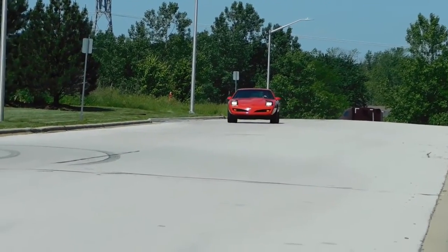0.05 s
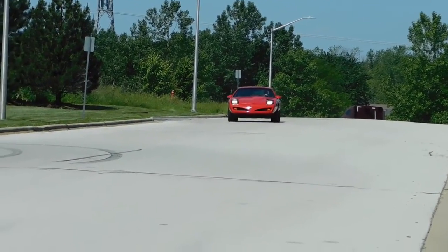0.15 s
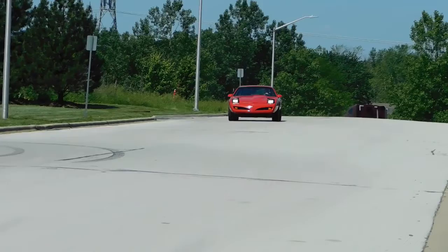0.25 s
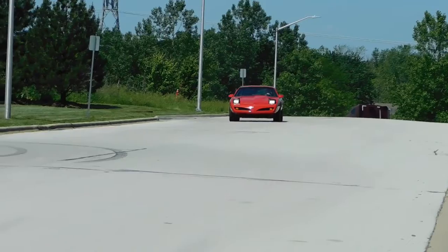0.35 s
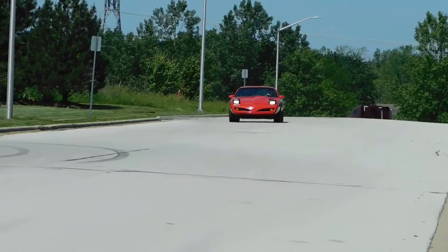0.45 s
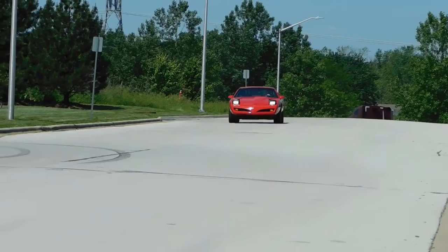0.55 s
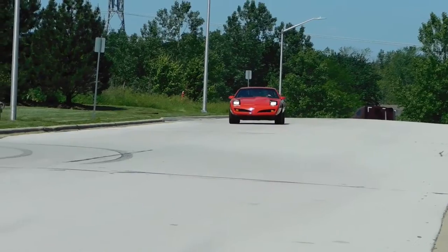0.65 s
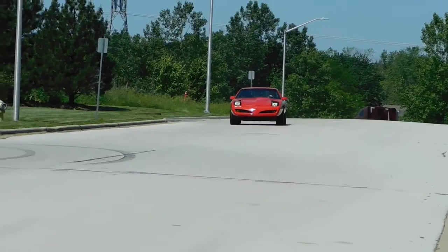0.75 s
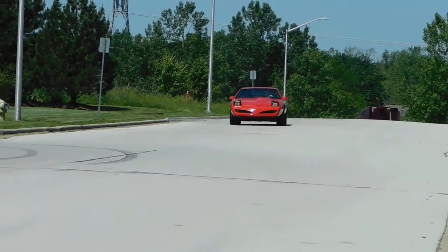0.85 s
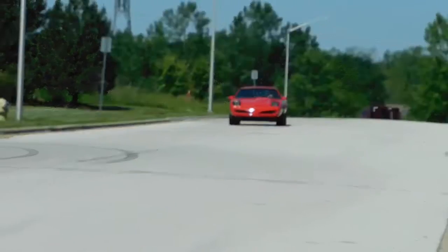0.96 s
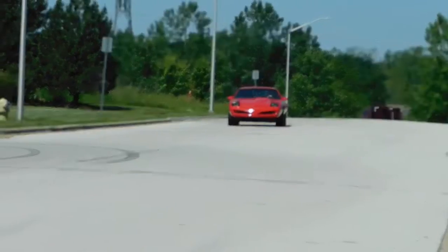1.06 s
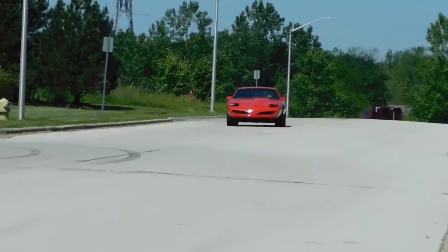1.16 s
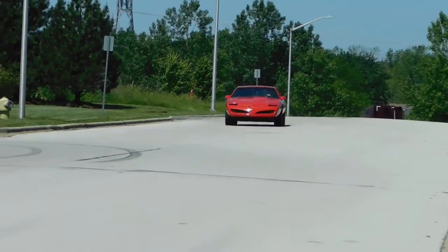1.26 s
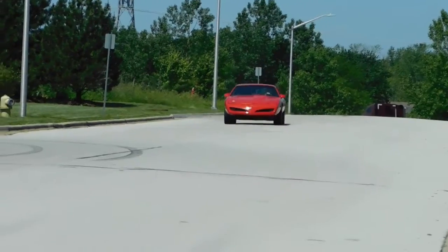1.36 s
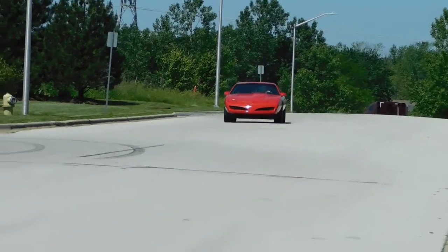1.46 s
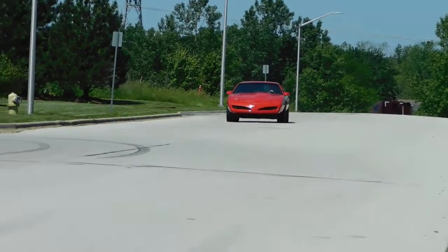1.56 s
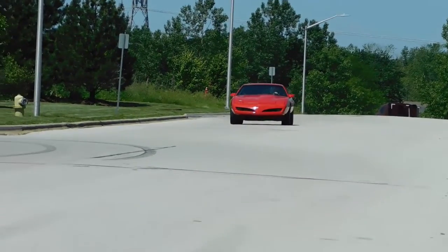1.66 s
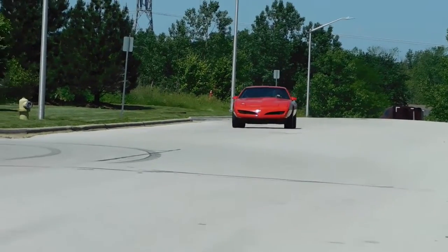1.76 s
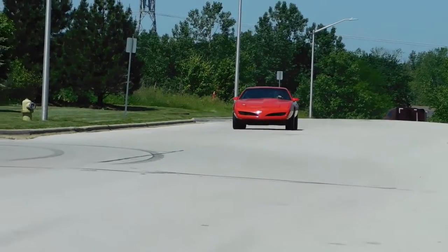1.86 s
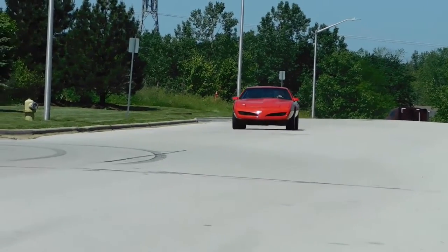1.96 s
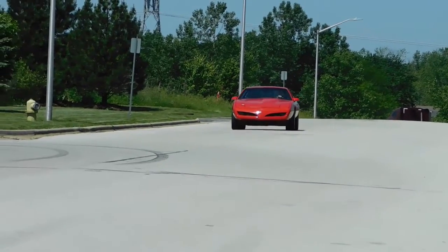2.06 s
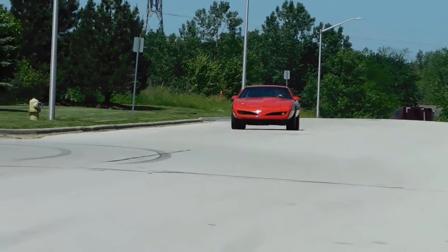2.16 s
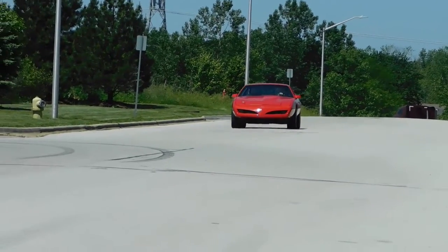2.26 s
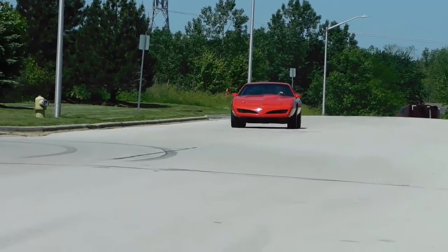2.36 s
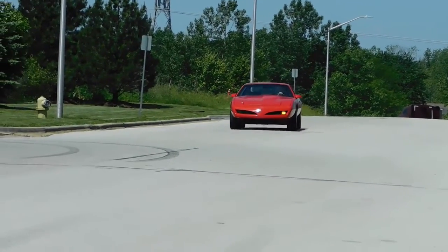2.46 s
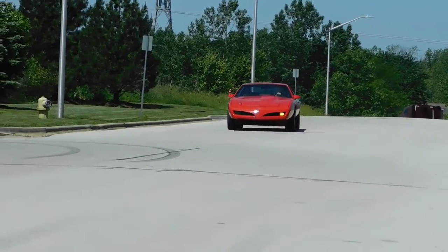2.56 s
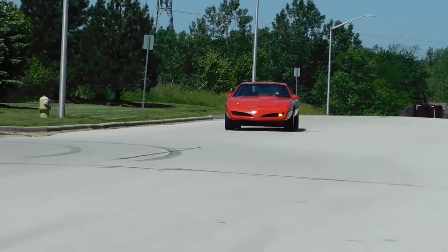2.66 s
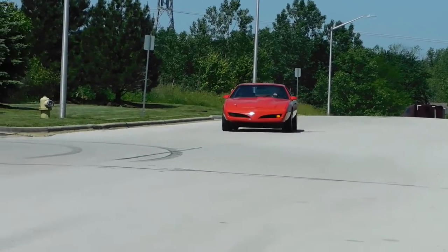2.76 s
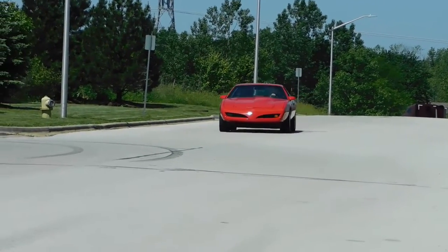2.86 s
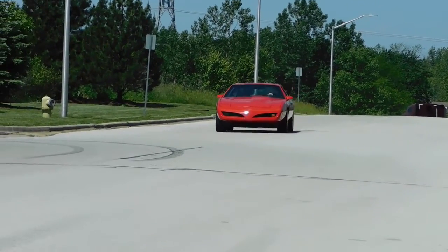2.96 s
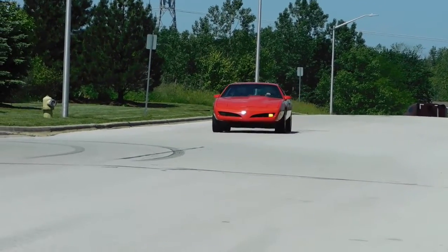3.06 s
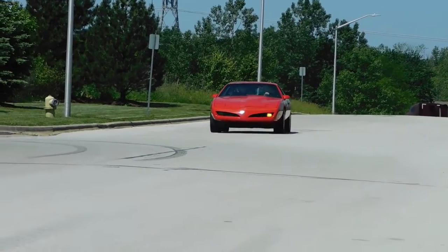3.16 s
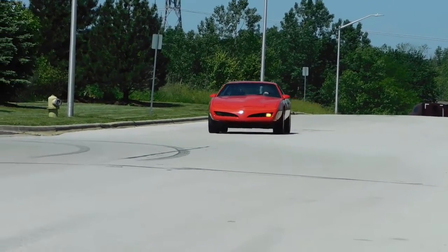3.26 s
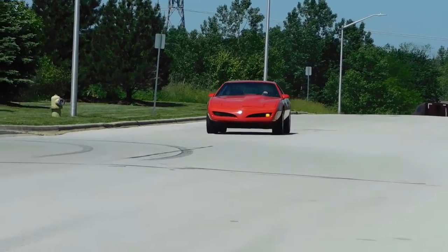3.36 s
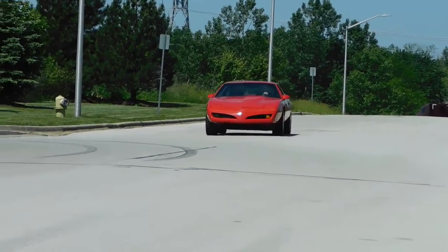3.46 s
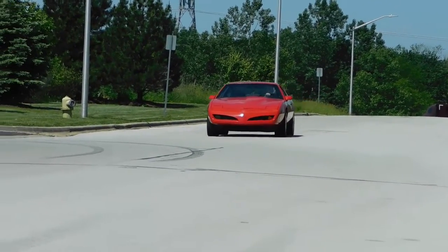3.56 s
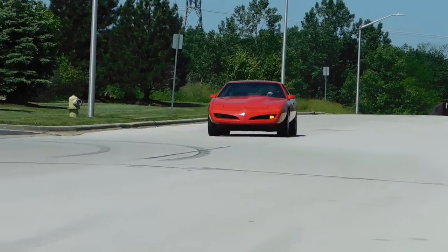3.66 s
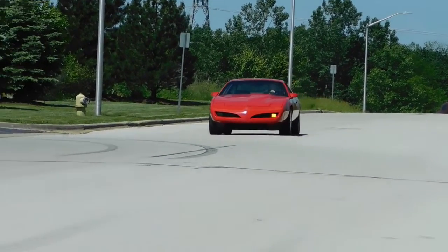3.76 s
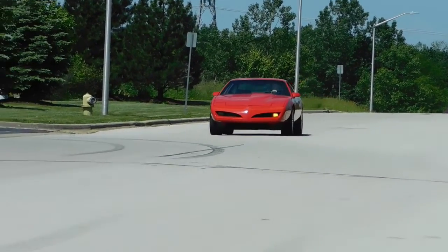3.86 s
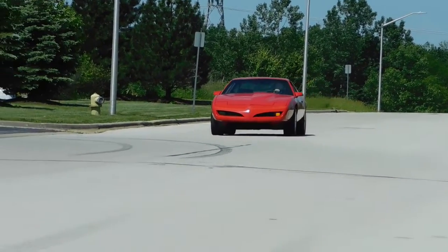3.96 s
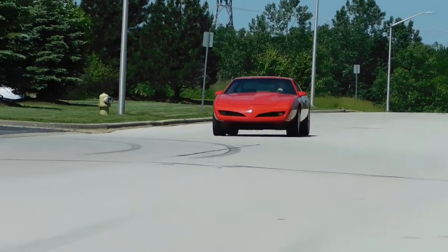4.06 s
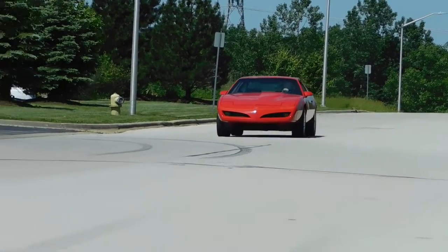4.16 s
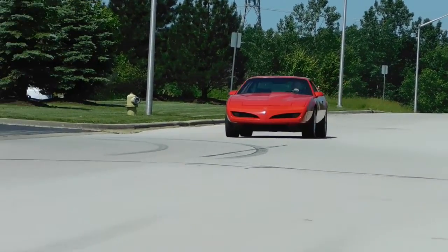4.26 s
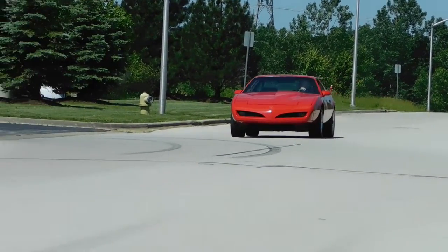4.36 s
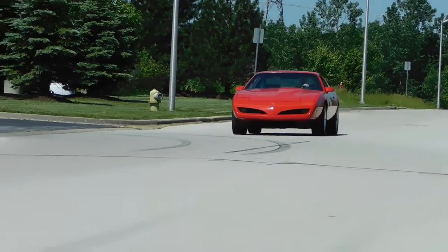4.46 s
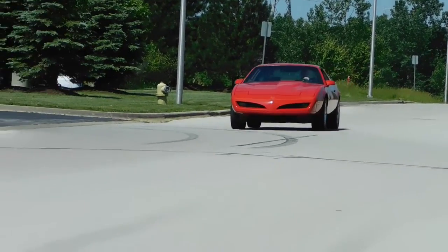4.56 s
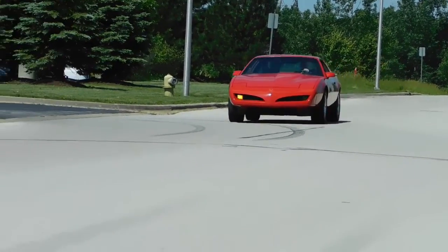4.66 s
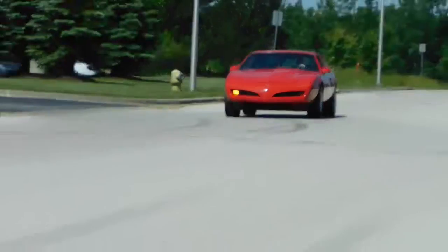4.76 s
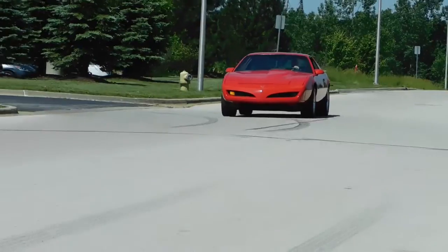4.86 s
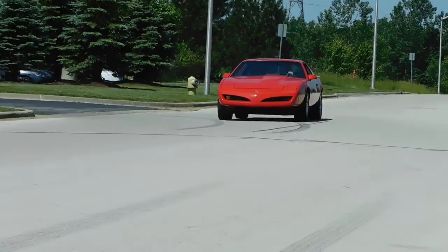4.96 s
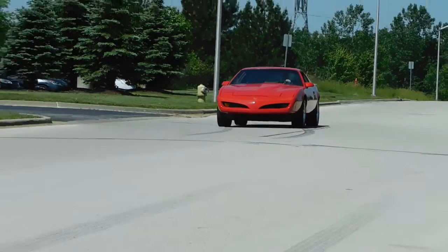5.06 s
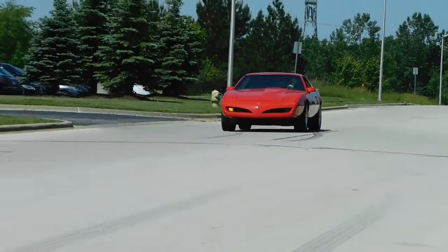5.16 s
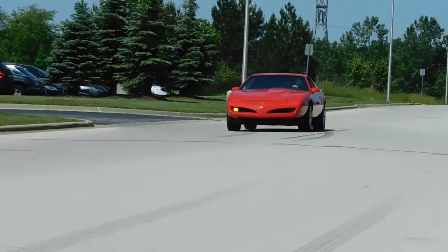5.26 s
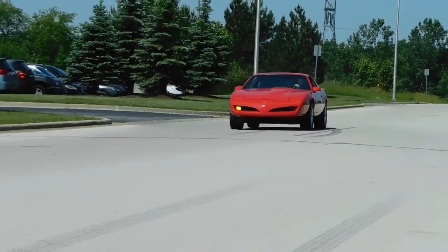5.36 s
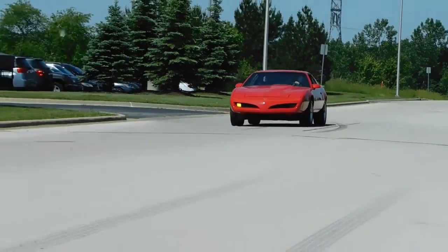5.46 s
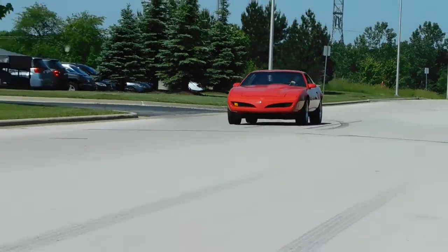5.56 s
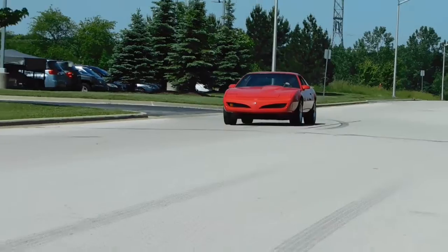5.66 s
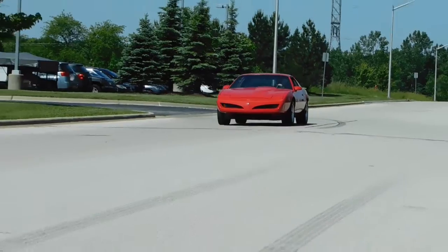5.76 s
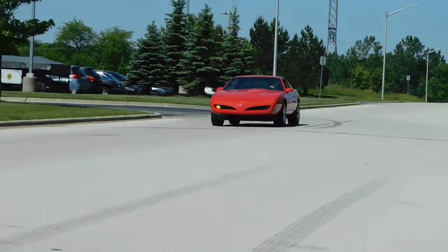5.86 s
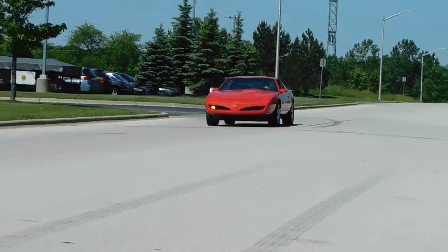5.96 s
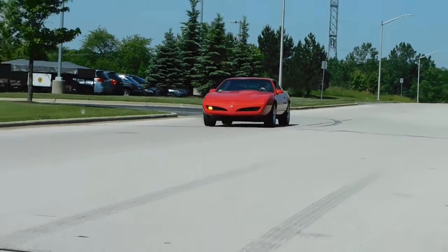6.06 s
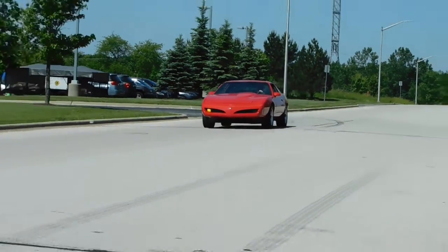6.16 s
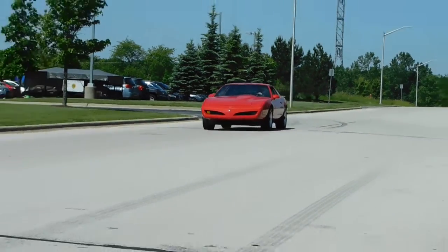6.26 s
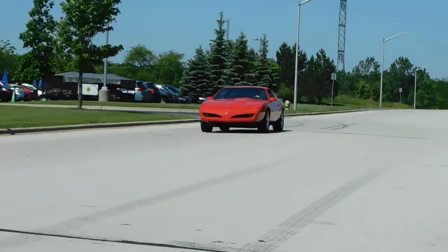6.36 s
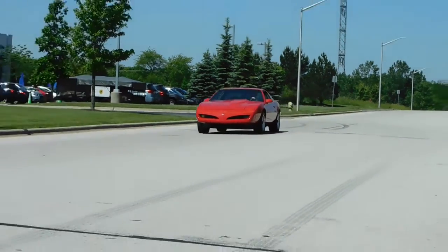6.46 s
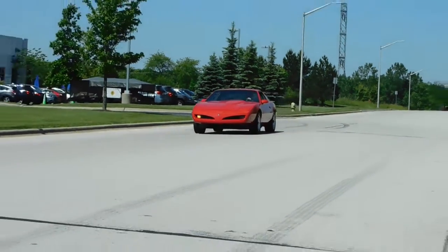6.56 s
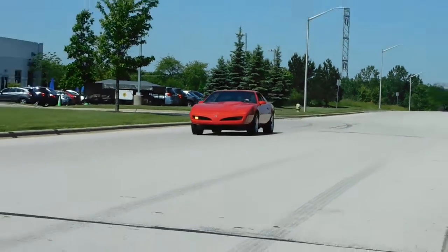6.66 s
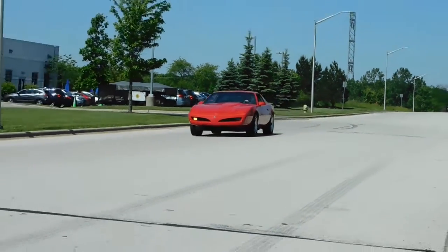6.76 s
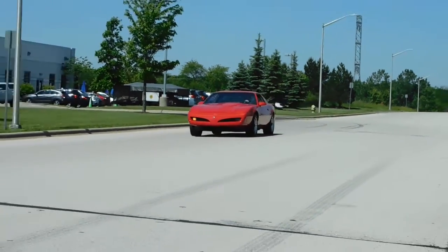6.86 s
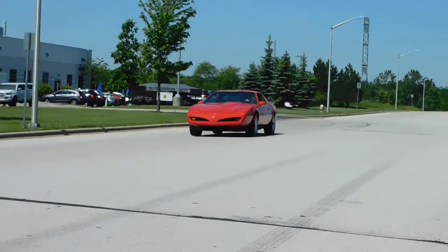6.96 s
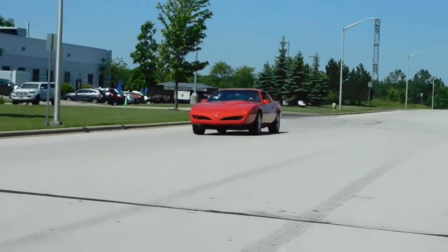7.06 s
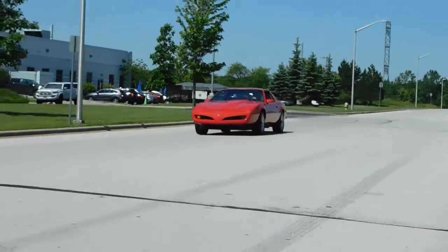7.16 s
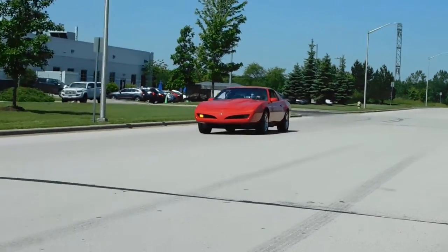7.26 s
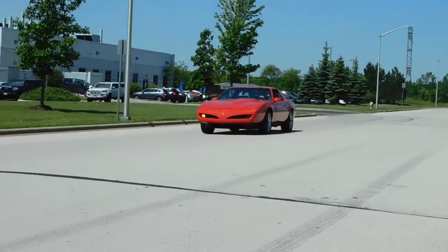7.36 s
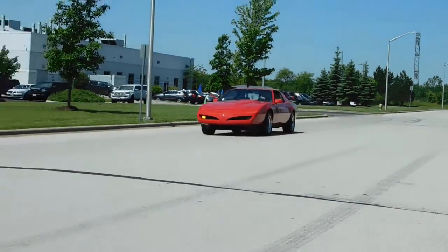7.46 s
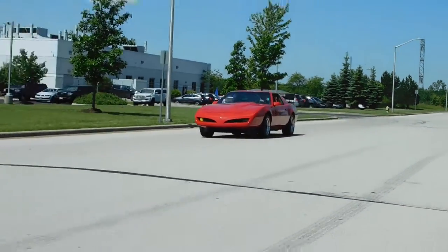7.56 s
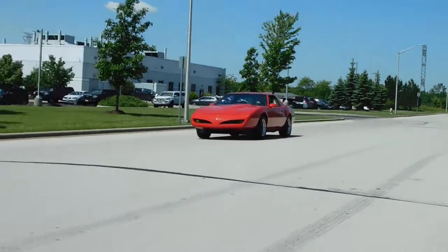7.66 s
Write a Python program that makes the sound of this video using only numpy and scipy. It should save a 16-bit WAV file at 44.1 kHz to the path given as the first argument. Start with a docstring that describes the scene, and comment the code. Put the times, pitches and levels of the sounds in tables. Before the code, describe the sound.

A V8 car approaches over concrete for about 7.7 seconds, heard by a hand-held camera's stereo microphone outdoors. At first there is mid-toned tyre roar and low exhaust hum over soft distant traffic and faint leaves. Small birds chip and slur, with buzzy nearer calls at 0.7 and 2.1 s. A faint tyre slap comes at 2.8 s. Near 4 s the engine rises under a dab of throttle, while quick double chips and a thin trill sound. Finger ticks at 4.7 s start a zoom motor, hissing and thinly whining on the left, with a short whistle. The engine eases; three short, bright two-tone horn toots sound at 5.2, 5.8 and 6.3 s, lightly echoing, the last with a sharp tyre slap. Tyre hiss and grit swell closer. A stony snap at 7.3 s precedes a hard rev, its pitch climbing steeply to the end.

```python
"""Car with a horn on a concrete road

A V8 coupe rolls toward a hand-held camera, toots its two-tone horn three times, then revs up hard.
Shaped noise makes the tyres, traffic and leaves; stacked sine waves make the engine and horn.
Birds are gliding whistles, and short decaying rings are tyre slaps and finger knocks.
The camera's zoom motor adds hiss and a wavering whine, louder on the left."""
import sys
import numpy as np
from scipy import signal
from scipy.fft import rfft, irfft, next_fast_len
from scipy.io import wavfile

SR = 44100
rng = np.random.default_rng(int(sys.argv[2]) if len(sys.argv) > 2 else 0)


def wav_record(signal):
    """Record a signal, one row per channel, as 16-bit PCM in the file named by sys.argv[1]."""
    frames = np.transpose(np.atleast_2d(signal))
    bounded = np.clip(frames, -1, 1)
    # unit amplitude maps onto the largest positive 16-bit level
    quanta = np.round(bounded * 32767).astype(np.int16)
    wavfile.write(sys.argv[1], SR, quanta)


N = 340438
TIME = np.arange(N) / SR

# colours of the noises, relative levels: pitch_hz, level_db (per Hz)
RUMBLE = [(25, -19), (45, -19), (70, -12.5), (110, -0.5), (200, 0), (320, -2.5), (440, 3.5), (600, -3.5),
          (900, -42)]  # low tyre rumble
ROAR = [(350, -14), (600, -16.5), (740, -6.5), (860, 0), (1000, 1), (1250, 0.5), (1400, -3), (1600, -9),
        (2000, -13), (2800, -24.5), (5000, -34)]  # tyre tread
HISS = [(900, -21), (1700, 3.5), (2600, 3.5), (3600, -2.5), (5000, -5), (7000, -3.5), (8500, -12),
        (10500, -20), (13500, -25.5), (16000, -25)]  # tyre hiss, also used for leaves
TRAFFIC = [(25, -6), (45, -11), (75, -1.5), (130, -5.5), (300, -2), (600, -1), (1000, -3), (1600, -0.5),
           (2300, -5.5), (3300, -7.5), (4200, -18.5), (7000, -31), (10000, -34.5), (16000, -38)]  # far traffic
GEARS = [(900, -16), (1800, -3), (2300, -3), (2650, 4), (3100, -3), (4500, -16.5), (6000, -16),
         (8000, -19.5), (11000, -22), (14000, -18), (16000, -32)]  # zoom motor gears
# how the microphone pair hears the scene: pitch_hz, left_minus_right_db
BALANCE_DB = [(60, .5), (200, .5), (400, 0), (500, -3), (620, 0), (760, 5.5), (1000, 5), (1200, 1.5),
              (1420, -1.5), (1850, 5), (2400, 2.5), (3300, 7), (4400, 7), (8000, 7), (13000, -2)]
# how alike left and right are: pitch_hz, likeness (1 same, 0 unrelated, -1 opposite)
CAR_LIKENESS = [(100, 0.95), (350, 1), (640, 0.76), (1200, 0.97), (3100, 0.91), (6800, -0.22),
                (14000, -0.94)]
FAR_LIKENESS = [(100, 1), (300, 0.97), (640, 0.85), (1400, -0.26), (3100, -0.67), (7000, 0.048),
                (14000, 0.44)]
# colour of echoes from trees and buildings: pitch_hz, level_db
ECHO = [(100, -14), (420, 4), (800, -1), (1500, 6.5), (4000, -6.5), (12000, -13)]
# the driver's foot, a dab of throttle, a coast, then a kick-down: time_s, firing_hz, load (0-1)
ENGINE = [(0, 74, 0.9), (1.2, 73.57, 0), (3.6, 72.4, 0), (3.98, 78, 0), (4.17, 86.1, 0.65),
          (4.58, 89.3, 0.6), (4.93, 73.93, .25), (5.5, 74.3, 0.5), (6.05, 76.5, 0.43), (6.9, 79.8, 0.13),
          (7.06, 81.43, .5), (7.33, 83.3, .4), (7.42, 105.9, 0.94), (7.5, 126.8, 0.94), (7.57, 138.1, 0.8),
          (7.72, 160.2, 0.12)]
# engine tones; uneven firing in each bank adds some three cycles off the main ones:
# multiple (of the two-turn cycle rate), level_db
ENGINE_ORDERS = [(5, 2), (8, 2.5), (11, -2), (13, -11), (14, -9), (16, 3), (19, -14.5), (21, -11),
                 (24, -6.5), (27, -10.5), (29, -16.5), (32, -18.5), (35, -7), (39, -9.5), (40, -17),
                 (45, -1), (48, -3.5)]
# exhaust resonances: pitch_hz, level_db
EXHAUST = [(35, -24), (55, -15.5), (76, 0.5), (88, -2.5), (108, 5), (130, 1), (155, -1.5), (200, -1),
           (228, 0), (249, 9.5), (275, -2), (310, 0.5), (360, 3), (460, -3.5), (700, -21), (1400, -20)]
# horn presses: start_s, end_s, level_db, brightness_db
TOOTS = [(5.238, 5.381, 1.5, -1.5), (5.786, 5.95, 1.5, -0.5), (6.342, 6.512, 1, 5.5)]
# at each press: doppler_pitch_ratio, lag_s (of a reflection off road or bodywork)
HORN_PATHS = [(1, .000635), (1.0003, .000695), (1.001, .00196)]
# horn harmonics: number, low_horn_db, high_horn_db
HORN = [(1, -39, -39.5), (2, -32.5, -42), (3, -30, -31), (4, -42, -33), (5, -39, -40.5), (6, -41, -50.5),
        (7, -48.5, -48.5), (8, -51, -52.5), (9, -57, -75), (10, -58.5, -66), (11, -79, -67),
        (12, -72, -66.5), (13, -73, -68), (14, -70, -71), (15, -74, -77), (16, -71, -78), (17, -74, -74),
        (19, -83, -73), (21, -71.5, -89)]
# sharp knocks: tyres slapping slab joints, and from 7.28 s a knock on the camera: time_s, level_db, ring_hz,
# ring_t60_s (time to fall 60 dB),
SLAPS = [(2.8061, -16.5, 1250, 0.02, -40), (2.8077, -26, 940, .014, -40), (2.817, -30, 1230, .04, -40),
         (2.881, -33, 1190, 0.04, -40), (6.285, -8, 1296, 0.0097, 1), (6.293, -19, 906, .016, -22),
         (7.284, -26, 1166, .008, 10), (7.344, -19, 1019, .008, 9.5)]
# fingers on the zoom lever and camera shell: same columns as SLAPS
HANDLING = [(4.671, -35, 3180, 0.0088, -15), (4.6905, -41, 2670, .05, -15), (4.697, -36, 4200, .004, -2),
            (4.721, -33, 3130, .006, -6), (4.7575, -25.5, 620, 0.019, 2)]
# shapes of the bird notes: share_of_length, pitch_hz, level_db
CALL_SHAPE = [(0, 6500, -20), (.14, 5700, -10), (.2, 4500, -6), (.31, 4900, 1.5), (.42, 4100, 3),
              (.53, 3380, -4), (.61, 3170, -14), (.69, 3100, -1), (.83, 4100, -8), (.88, 3450, -1),
              (1, 3100, 3)]
CHIP_SHAPE = [(0, 4890, -4), (.5, 4390, -2), (1, 3630, -3)]
SLUR_SHAPE = [(0, 4450, -3), (.55, 4080, -1.5), (1, 4400, -2)]
THIN_SHAPE = [(0, 6950, -2), (.4, 7220, 0), (1, 7280, -2)]
# a near bird's buzzy two-part call: start_s, length_s, level_db, stretch (of pitch above CALL_BASE_HZ)
CALLS_NEAR = [(.712, .128, -53.5, .88), (2.136, .153, -50, 1.22)]
# falling chips, soft slurs and thin rising whistles: start_s, length_s, level_db, pitch_ratio
CHIPS = [(.172, 0.04, -64, 1.04), (1.352, .04, -65, 1.1), (1.72, .045, -68, 1.02), (2.42, .035, -66, 1.04),
         (3.625, .045, -62, 1.01), (3.842, .025, -58, 1.0), (3.88, .025, -63, 1.0)]
SLURS = [(0.347, .075, -65, 0.93), (1.53, .07, -67, 1.04), (1.775, 0.061, -59, .86),
         (2.66, .045, -67, 1.02), (3.795, 0.082, -62, 1.02)]
THIN_NOTES = [(3.64, .08, -75, 1.0), (3.89, .075, -75, .995)]

# the car closes in at a steady speed and would pass the camera at PASS_S
SPEED_M_PER_S, PASS_S, KERB_M = 9.08, 8.643, 3.6
# parts of the car: level at NEAR_M (dB), loss per doubling of the distance (dB)
NEAR_M = 9.0
RUMBLE_DB, RUMBLE_LOSS_DB = -41.5, 6.5
ROAR_DB, ROAR_LOSS_DB = -28.0, 6
HISS_DB, HISS_LOSS_DB = -32.0, 14.5
ENGINE_DB, ENGINE_LOSS_DB = -39.5, 10
LOAD_DB = 8.5  # full load over coasting
# exhaust gas adds to the rumble as the firing rate climbs; no change at RUSH_FROM_HZ
RUSH_FROM_HZ, RUSH_DB_PER_OCTAVE = 78, 4.5
# the brow of the road screens the tyre roar until the car has climbed over it
CREST_S, CREST_LASTS_S, CREST_SHADOW_DB = 2.37, 0.35, 2.5
LEAVES_DB, TRAFFIC_DB = -65, -49.0
CALL_BASE_HZ = 3040
# a run of double chips at an even pace
RUN_START_S, RUN_PERIOD_S, PAIR_GAP_S, RUN_CHIP_S, RUN_DB = 4.008, .149, .036, 0.0261, -59.5
# a long, slowly sinking thin trill
TRILL_START_S, TRILL_S, TRILL_FROM_HZ, TRILL_TO_HZ, TRILL_DB = 4.06, .44, 7600, 7380, -71
# the zoom motor surges as it starts, runs evenly, then its whine fades
ZOOM_START_S, SURGE_DB, SURGE_S = 4.692, 6.5, 0.043
GEARS_DB, WHINE_DB, WHISTLE_DB = -52.5, -63.5, -54.5
WHINE_HOLD_S, WHINE_FADE_DB_PER_S = 0.85, 5
LOW_HORN_HZ, HIGH_HORN_HZ = 384.8, 470.5
CUTOFF_HZ = 15600


def from_db(db):
    """Turn decibels into a gain."""
    return 10 ** (np.asarray(db) / 20)


def rms_one(x):
    """Scale to an average strength (rms) of 1."""
    return x / np.sqrt(np.mean(x ** 2) + 1e-20)


def in_time(rows):
    """Turn a table whose first column is time into one smooth-running curve per other column."""
    s, *columns = np.transpose(rows)
    return [np.interp(TIME, s, column) for column in columns]


def at_hz(points, hz):
    """Read a pitch table at any pitch, on a log-frequency scale."""
    table_hz, values = np.array(points)[:, 0], np.array(points)[:, 1]
    return np.interp(np.log(hz), np.log(table_hz), values)


def pan(db):
    """Left and right gains that differ by db."""
    return from_db(np.array([[db / 2], [-db / 2]]))


def drift(rate):
    """A random wander of spread 1; a higher rate (Hz) wanders faster."""
    step = 40  # samples between the points worked out
    r = np.exp(-2 * np.pi * rate * step / SR)
    kicks = rng.standard_normal(N // step + 2002)
    slow = signal.lfilter([1], [1, -2 * r, r * r], kicks)[2000:]  # skip the settling time
    return np.interp(np.arange(N) / step, np.arange(len(slow)), rms_one(slow))


def noise(spectrum, likeness):
    """Stereo noise of rms 1 with a given colour, falling away beyond both ends of its table."""
    size = next_fast_len(N)
    hz = np.maximum(np.fft.rfftfreq(size, 1 / SR), 1)
    low_end = np.minimum(hz / spectrum[0][0], 1) ** 2
    high_end = np.minimum(spectrum[-1][0] / hz, 1) ** 2
    colour = from_db(at_hz(spectrum, hz)) * low_end * high_end
    mid, side = rfft(rng.standard_normal((2, size))) * colour
    alike = np.clip(at_hz(likeness, hz), -1, 1)
    stereo = np.sqrt(1 + alike) * mid + np.sqrt(1 - alike) * side * [[1], [-1]]
    return rms_one(irfft(stereo, size)[:, :N])


def phase_of(hz):
    """Running phase of a changing frequency."""
    return 2 * np.pi * np.cumsum(hz) / SR


def at_distance(near_db, loss_db):
    """Level over time of a part of the car's sound as the car closes in."""
    metres = np.hypot(SPEED_M_PER_S * (PASS_S - TIME), KERB_M)
    return near_db - loss_db * np.log2(metres / NEAR_M)


def tyres(flutter_db, hiss_flutter_db):
    """Rumble joined by exhaust rush, tread roar near 1 kHz and close-range hiss; moving air wavers the last two."""
    rush_db = RUSH_DB_PER_OCTAVE * np.log2(in_time(ENGINE)[0] / RUSH_FROM_HZ)
    shadow_db = CREST_SHADOW_DB * (1 - np.tanh((TIME - CREST_S) / CREST_LASTS_S)) / 2
    rumble_db = at_distance(RUMBLE_DB, RUMBLE_LOSS_DB) + rush_db
    roar_db = at_distance(ROAR_DB, ROAR_LOSS_DB) - shadow_db + flutter_db * drift(14)
    hiss_db = at_distance(HISS_DB, HISS_LOSS_DB) + hiss_flutter_db * drift(28)
    rumble = from_db(rumble_db) * noise(RUMBLE, CAR_LIKENESS)
    roar = from_db(roar_db) * noise(ROAR, CAR_LIKENESS)
    hiss = from_db(hiss_db) * noise(HISS, CAR_LIKENESS)
    return rumble + roar + hiss


def engine(jitter, rough, boom_db):
    """Tones tied to the firing rate sweep through the exhaust resonances; under load the silencer booms."""
    firing_hz, load = in_time(ENGINE)
    level_db = at_distance(ENGINE_DB, ENGINE_LOSS_DB) + LOAD_DB * load
    cycle_hz = firing_hz / 8  # eight firings in each two-turn cycle
    phase = phase_of(cycle_hz * (1 + jitter * drift(11.2)))
    tones, power = 0, 0
    for order, db in ENGINE_ORDERS:
        order = round(order)
        hz = order * cycle_hz
        boom = np.interp(hz, [90, 177, 250, 302.3], [-0.28, 0.84, 1.0, 0.75])
        gain = from_db(db + at_hz(EXHAUST, hz) + boom_db * load * boom)
        roughness = 1 + rough * drift(8.3)
        tones = tones + gain * roughness * np.sin(order * phase + rng.uniform(0, 2 * np.pi))
        power = power + gain ** 2 / 2
    # resonances and boom colour the tone; level_db sets its strength
    return from_db(level_db) * tones / np.sqrt(power)


def far_traffic():
    """Traffic far off: a steady noise, strongest in the lows and mids."""
    return from_db(TRAFFIC_DB) * noise(TRAFFIC, FAR_LIKENESS)


def leaves():
    """The roadside trees: a faint steady hiss."""
    return from_db(LEAVES_DB) * noise(HISS, CAR_LIKENESS)


def notes(shape, rows, buzz_hz, buzz_share, edge_s, base_hz=0):
    """Whistles of one shape, stretched in time and in pitch above a base; a fast buzz grows with the pitch."""
    out = np.zeros(N)
    share, shape_hz, shape_db = np.transpose(shape)
    for start, length, db, ratio in rows:
        t = np.arange(int(length * SR)) / SR
        buzz = 1 + buzz_share * np.sin(2 * np.pi * buzz_hz * t + rng.uniform(0, 2 * np.pi))
        glide_hz = np.interp(t / length, share, shape_hz)
        hz = base_hz + ratio * buzz * (glide_hz - base_hz)
        edges = np.clip(np.minimum(t, length - t) / edge_s, 0, 1)
        swell = edges * from_db(db + np.interp(t / length, share, shape_db))
        at = int(start * SR)
        out[at:at + len(t)] += np.sqrt(2) * swell * np.sin(phase_of(hz))
    return out


def birds(flutter_db, count):
    """A near bird calls twice; others chip, slur and whistle, ending in a run of double chips under a trill."""
    run = [(RUN_START_S + k * RUN_PERIOD_S + gap, RUN_CHIP_S, RUN_DB, 1)
           for k in range(count) for gap in (0, PAIR_GAP_S)]
    trill_shape = [(0, TRILL_FROM_HZ, 0), (1, TRILL_TO_HZ, 0)]
    trill_row = [(TRILL_START_S, TRILL_S, TRILL_DB, 1)]
    chips = notes(CHIP_SHAPE, list(CHIPS) + run, buzz_hz=211, buzz_share=.018, edge_s=.007)
    slurs = notes(SLUR_SHAPE, SLURS, buzz_hz=211, buzz_share=.025, edge_s=.015)
    calls = notes(CALL_SHAPE, CALLS_NEAR, buzz_hz=210, buzz_share=0.19, edge_s=.006, base_hz=CALL_BASE_HZ)
    thin = notes(THIN_SHAPE, THIN_NOTES, buzz_hz=211, buzz_share=.007, edge_s=.015)
    trill = notes(trill_shape, trill_row, buzz_hz=70, buzz_share=.009, edge_s=.06)
    return (chips + slurs + calls + thin + trill) * from_db(flutter_db * drift(41))


def outdoors(x, t60, first_s):
    """Scattered echoes from trees and walls, partly different at each microphone."""
    t = np.arange(SR) / SR
    common, own = rng.standard_normal(SR), rng.standard_normal((2, SR))
    echoes = (common + own) * from_db(-60 * t / t60) * (t > first_s)
    echoes /= np.sqrt(np.sum(echoes ** 2) / 2)
    size = next_fast_len(N + SR)
    colour = from_db(at_hz(ECHO, np.maximum(np.fft.rfftfreq(size, 1 / SR), 1)))
    return irfft(rfft(x, size) * rfft(echoes, size) * colour, size)[:, :N]


def knocks(rows, crack_hz, crack_t60, contact_s):
    """A short contact, tyre on joint or finger on shell, sets off a crack and a brief ring."""
    out = np.zeros(N)
    for start, db, hz, t60, crack_db in rows:
        t = np.maximum(TIME - start, 0)[:int((start + .1) * SR)]
        ring = np.sin(2 * np.pi * hz * t) * from_db(-60 * t / t60) * (1 - np.exp(-t / contact_s))
        crack = np.sin(2 * np.pi * crack_hz * t) * from_db(crack_db - 60 * t / crack_t60)
        out[:len(t)] += from_db(db) * (ring + crack)
    return signal.sosfilt(signal.butter(2, [400, 6000], "band", fs=SR, output="sos"), out)


def zoom_motor(whine_hz, turn_hz, throb):
    """A tiny motor: gear hiss and a wavering whine throb once a turn; a short whistle follows the start."""
    t = np.maximum(TIME - ZOOM_START_S, 0)
    drive = (t > 0) * from_db(SURGE_DB * np.exp(-t / SURGE_S))
    whine_db = WHINE_DB - WHINE_FADE_DB_PER_S * np.maximum(t - WHINE_HOLD_S, 0)
    turn = np.cos(phase_of(turn_hz * (1 + 0.0086 * drift(6))))
    whine = rms_one(np.sin(phase_of(whine_hz + 90 * drift(159.6))) * (1 + throb * turn))
    hiss = noise(GEARS, [(1000, 0.21), (8000, 0)]) * (1 + 0.31 * turn)
    whistle_swell = np.interp(TIME, [4.765, 4.79, 4.88, 4.92], [0.18, 0.5, 0.77, 0])
    # before its first point the swell holds, but the drive keeps it silent until the motor starts
    whistle = whistle_swell * np.sin(phase_of(4010 + 15 * drift(40)))
    tones = from_db(whine_db) * whine + from_db(WHISTLE_DB) * whistle
    return drive * (from_db(GEARS_DB) * hiss * pan(6.9) + tones * pan(11.2))


def trumpet(hz, column, late_s, linger_s, rise_s, fall_s, sag, waver_db):
    """One horn: its diaphragm swings up, holds and sags on release; upper harmonics need the full swing."""
    out = np.zeros(N)
    for (start, end, level_db, bright_db), (ratio, lag) in zip(TOOTS, HORN_PATHS):
        span = slice(int((start - .03) * SR), int((end + .15) * SR))
        t = TIME[span]
        released = np.maximum(t - end - linger_s, 0)
        swing = np.exp(-released / fall_s) / (1 + np.exp(-(t - start - late_s) / rise_s))
        phase = phase_of(hz * ratio * (1 - sag * (1 - swing) + 0.0024 * drift(60)[span]))
        for row in HORN:
            k = round(row[0])
            bright = np.clip((k * hz - 1400) / 500, 0, 1)
            waver = np.interp(t, np.linspace(t[0], t[-1], 12), rng.standard_normal(12))
            # direct and reflected sound interfere
            comb = abs(1 + 0.5 * np.exp(-2j * np.pi * k * hz * lag))
            harmonic_db = row[column] + level_db + bright * bright_db + waver_db * np.sqrt(k) * waver
            gain = np.sqrt(2) * comb * from_db(harmonic_db) * swing ** (k ** 1.16)
            out[span] += gain * np.sin(k * phase + rng.uniform(0, 2 * np.pi))
    return out


def horn():
    """Two horns; the low one answers and stops a little later. Their diaphragms add a dry rasp."""
    low = trumpet(LOW_HORN_HZ, column=1, late_s=0.007, linger_s=0.017, rise_s=0.0063,
                  fall_s=0.03, sag=0.0062, waver_db=0.8)
    high = trumpet(HIGH_HORN_HZ, column=2, late_s=0.0005, linger_s=0.00078, rise_s=0.0034,
                   fall_s=0.0096, sag=0.0048, waver_db=.5)
    rasp_noise = noise([(2500, 9.5), (5000, -13), (8000, -8.0), (12000, -26)], CAR_LIKENESS)[0]
    rasp = (low + high) * rasp_noise
    return low + high + from_db(-30.0) * rasp


def receding_echo(x, drop):
    """Horn sound thrown back from behind the moving car comes late and slightly flat."""
    out = np.zeros(N)
    for start, *_ in TOOTS:
        t = TIME - start - .1
        window = np.interp(t, [0, .01, .16, .18], [0, 1, 1, 0])
        out += np.interp(start + t * (1 - drop), TIME, x) * window  # slower playback lowers the pitch
    return signal.sosfilt(signal.butter(2, [420, 560], "band", fs=SR, output="sos"), out)


def grit(s, db, t60, sizzle_db, sizzle_loss_db):
    """Fine grit sizzles under the tyres, heard only as the car comes close; then a bright tick sounds, a knock
    on the camera."""
    # air swallows the top octave, so the sizzle swells faster than the rest
    sizzle = from_db(at_distance(sizzle_db, sizzle_loss_db))
    snap = (TIME > s) * from_db(db - 60 * np.minimum(np.abs(TIME - s) / t60, 2))
    colour = [(5000, -1.5), (8000, 6.5), (11000, -20.5), (13500, -5), (15000, -13.5)]
    return (sizzle + snap) * noise(colour, [(3000, .5), (15000, .3)])


def scene():
    """The car with its echoes, birds, leaves, far traffic and the camera itself."""
    rolling = tyres(flutter_db=0.7, hiss_flutter_db=1.6)
    exhaust = engine(jitter=.004, rough=.3, boom_db=8)
    song = birds(flutter_db=3.0, count=4)
    joints = knocks(SLAPS, crack_hz=2080, crack_t60=0.0029, contact_s=0.00043)
    fingers = knocks(HANDLING, crack_hz=1880, crack_t60=.005, contact_s=0.00026) * pan(4)
    zoom = zoom_motor(whine_hz=6950, turn_hz=123.0, throb=0.85)
    toots = horn()
    grit_and_tick = grit(s=7.2855, db=-33, t60=.012, sizzle_db=-41.5, sizzle_loss_db=23.5)
    car = rolling + exhaust + toots + joints + grit_and_tick
    echoes = outdoors(from_db(-18) * toots + from_db(-15.0) * joints, t60=0.46, first_s=0.0097)
    echoes = echoes + from_db(-10.5) * receding_echo(toots, drop=.02)
    trees = song * pan(2.3) + from_db(1) * outdoors(song, t60=0.18, first_s=0.0044)
    return car + echoes + trees + far_traffic() + leaves() + fingers + zoom


def record(dry):
    """The camera body shades the two microphones differently; the top is cut."""
    size = next_fast_len(N + 4096)
    tilt_db = at_hz(BALANCE_DB, np.maximum(np.fft.rfftfreq(size, 1 / SR), 1))
    shade = from_db(tilt_db * np.array([[.5], [-.5]]))
    heard = irfft(rfft(dry, size) * shade / shade.mean(axis=0), size)[:, :N]
    return signal.sosfiltfilt(signal.ellip(10, .1, 70, CUTOFF_HZ, fs=SR, output="sos"), heard)


dry = scene()
out = record(dry)
wav_record(out)
```